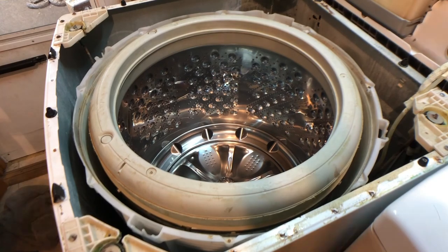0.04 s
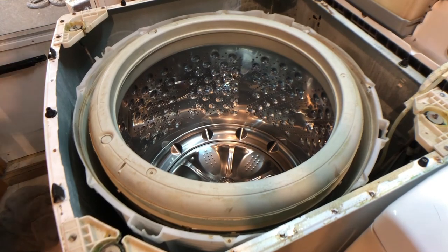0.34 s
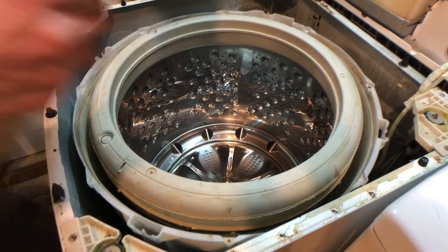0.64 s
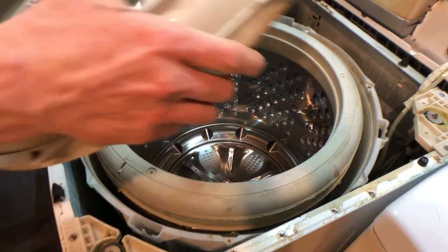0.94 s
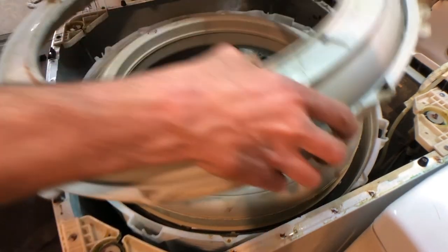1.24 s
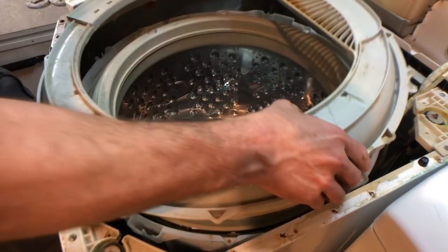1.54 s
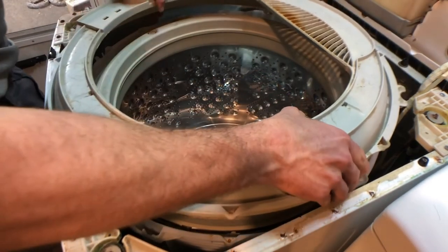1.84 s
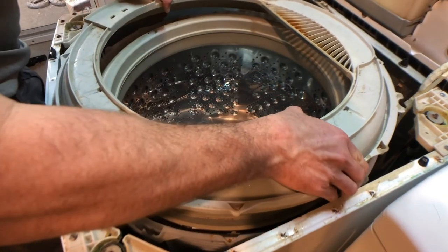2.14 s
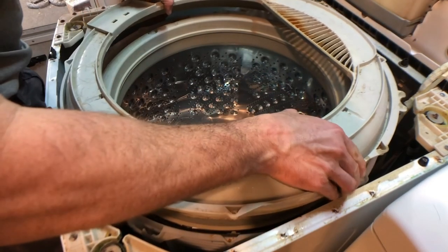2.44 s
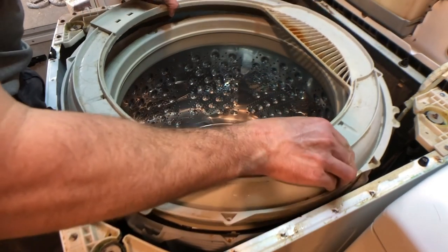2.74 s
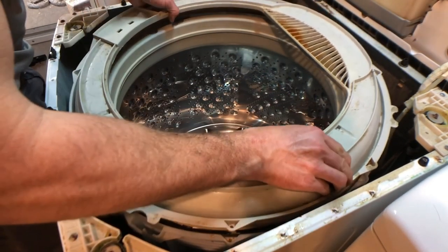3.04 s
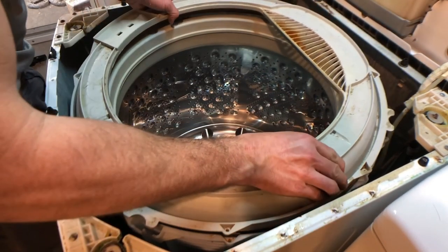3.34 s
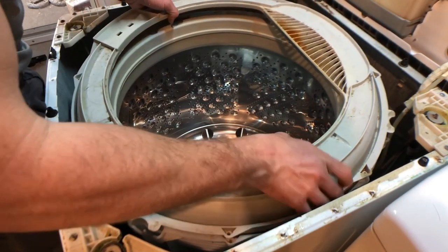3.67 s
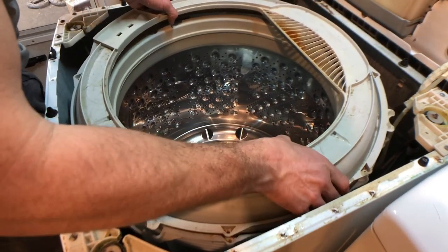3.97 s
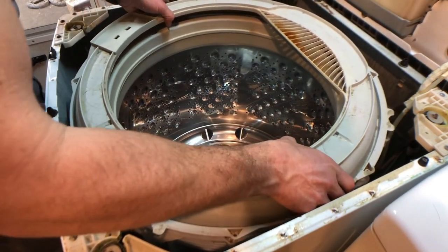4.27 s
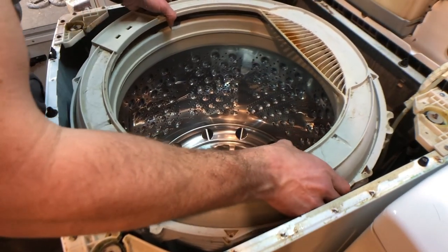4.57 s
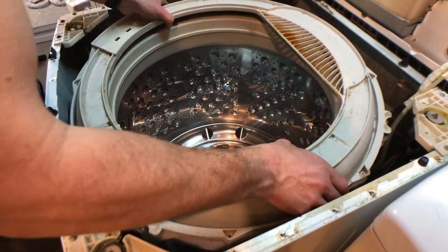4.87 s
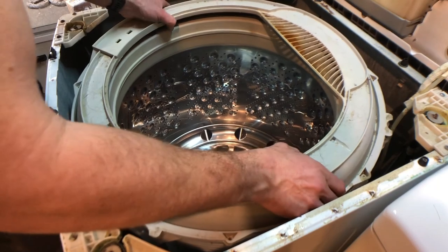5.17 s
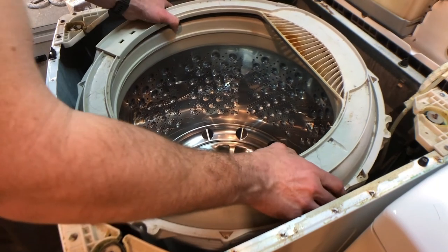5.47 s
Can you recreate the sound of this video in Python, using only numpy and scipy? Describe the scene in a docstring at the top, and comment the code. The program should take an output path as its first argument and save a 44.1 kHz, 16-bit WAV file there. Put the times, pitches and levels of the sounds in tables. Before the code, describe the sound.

Close by in a small room, a big plastic ring is fitted onto a washer tub. Faint handling rustles and ticks lead to a clack as it is set down. Short scrapes and scattered plastic knocks follow, with the hollow tub thumping and briefly ringing under each push. A last hard press gives several loud, rapid knocks with a deep boom.

```python
"""Plastic ring pressed onto a washer tub.

A large plastic ring is carried over a washing machine, set on its tub and pressed home, close by
in a small room. Fingers brush it, its rim scrapes and clacks on the tub's edge, and each push makes
the hollow tub thump. An early nudge leaves the microphone's support swaying slowly."""
import sys
import numpy as np
from scipy import signal
from scipy.fft import rfft, irfft, next_fast_len
from scipy.io import wavfile
from scipy.ndimage import map_coordinates

SR = 44100
rng = np.random.default_rng(int(sys.argv[2]) if len(sys.argv) > 2 else 0)


def unload_wav(signal):
    """Save mono or channel-first audio to the path in sys.argv[1] as 16-bit WAV at rate SR, clipped to [-1, 1]."""
    wavfile.write(
        sys.argv[1],
        SR,
        np.round(np.clip(np.atleast_2d(signal).T, -1, 1) * 32767).astype(np.int16),
    )


N = 247401


def amp(db):
    """Decibels to gain."""
    return 10 ** (np.asarray(db) / 20)


def unit(x):
    """Scale to rms 1."""
    return x / np.sqrt(np.mean(x ** 2) + 1e-20)


def along(points, hz):
    """Interpolate (Hz, value) points on a log frequency axis."""
    point_hz, values = np.transpose(points)
    return np.interp(np.log(hz + 1), np.log(point_hz + 1), values)


def wobble(knots_per_s):
    """Smooth random curve."""
    knots = rng.standard_normal(int(N * knots_per_s / SR) + 4)
    return map_coordinates(knots, [np.arange(N) * knots_per_s / SR])


def fading(start_s, t60_s):
    """Envelope that jumps to 1 and falls 60 dB in t60_s."""
    age = np.arange(N) / SR - start_s
    return (age >= 0) * amp(-60 * np.maximum(age, 0) / t60_s)


def held(start_s, length_s, attack_s, release_s):
    """Envelope that swells, holds and dies away."""
    age = np.maximum(np.arange(N) / SR - start_s, 0)
    return (1 - np.exp(-age / attack_s)) * np.exp(-np.maximum(age - length_s, 0) / release_s)


def add(track, start_s, sound):
    """Mix a sound into a track."""
    part = track[max(round(start_s * SR), 0):][:len(sound)]
    part += sound[:len(part)]


def through(x, response):
    """Convolve with an impulse response, keeping the length."""
    return signal.fftconvolve(x, response)[:len(x)]


def excite(blow, response):
    """A blow rings through a response and keeps its energy."""
    ringing = through(np.pad(blow, (0, SR // 10)), response)
    return ringing * np.linalg.norm(blow) / np.linalg.norm(ringing)


def burst(t60_points, size=8192):
    """A blow into crowded modes: noise whose bands each die at their own rate."""
    hz, t, bands = signal.stft(rng.standard_normal(size), SR, nperseg=256)
    decay = amp(-60 * t / along(t60_points, hz)[:, None])
    return signal.istft(bands * decay, SR, nperseg=256)[1][:size]


def slips(per_s, smooth):
    """Friction of rms 1: tiny uneven slips over a smooth drag."""
    grains = (rng.random(N) < per_s / SR) * rng.standard_normal(N)
    return unit(unit(grains) + smooth * rng.standard_normal(N))


def favour(x, hz, boost, q, low_share=0.38):
    """The contact point favours one band and hardly stirs lower modes; power is kept."""
    peaked = x + boost * signal.lfilter(*signal.iirpeak(hz, q, SR), x)
    cutoff_hz = low_share * min(hz, 1200)
    shaped = signal.lfilter(*signal.butter(2, cutoff_hz, "highpass", fs=SR), peaked)
    return shaped * np.std(x) / np.std(shaped)


# Each row: resonance in Hz, width in Hz, relative height in dB.
RING_MODES = [(333, 58, 7), (511, 94, 9), (615, 78, 1), (693, 73, -0.5), (725, 9.7, 0), (807, 225, 1),
              (1013, 340, -0.5), (1104, 100, -12.5), (1350, 73, -5.5), (1553, 94, -5), (1690, 24, -1.5),
              (2110, 37, -8), (2405, 150, -3.5), (2730, 140, -13)]


def colour(spectrum, ring_db=0, size=8192):
    """Minimum-phase response of a spectrum; ring_db scales the ring's resonance peaks on it."""
    hz = np.fft.rfftfreq(size, 1 / SR)
    peaks = sum(amp(db) / (1 + (2 * (hz - mode_hz) / width) ** 2) for mode_hz, width, db in RING_MODES)
    magnitude = unit(amp(along(spectrum, hz) + ring_db * peaks))
    cepstrum = irfft(np.log(magnitude))
    cepstrum[1:size // 2] *= 2
    cepstrum[size // 2 + 1:] = 0
    return irfft(np.exp(rfft(cepstrum)))


# Each row: frequency in Hz, relative level in dB.
AIR_SPECTRUM = [(20, 7.5), (60, 16), (150, -3.5), (500, -2.5), (1500, -5), (3000, -23), (5000, -25),
                (10000, -26.5), (15500, -29.5)]


def air(level_db=-64):
    """Quiet, steady air of the room."""
    return amp(level_db) * through(rng.standard_normal(N), colour(AIR_SPECTRUM))


# Each row: frequency in Hz, relative level in dB.
RUMBLE_SPECTRUM = [(8, -15), (20, -24), (32, -12.5), (50, -21.5), (90, -44.5), (200, -58), (800, -110)]


def microphone_sway(sway_hz=9.6, level_db=-25, nudge_s=0.17, rise_s=0.065, hold_s=0.72, fade_db_per_s=8):
    """A nudge swings the microphone below hearing; swing, nudge and pushes add a faint rumble."""
    t = np.arange(N) / SR
    fade_db = fade_db_per_s * np.maximum(t - nudge_s - hold_s, 0)
    reach = amp(level_db - fade_db) * (1 - np.exp(-np.maximum(t - nudge_s, 0) / rise_s))
    swing = np.sqrt(2) * np.sin(2 * np.pi * sway_hz * t + 0.28 * wobble(2.97))
    jolts = [(nudge_s, -31)] + [(start_s, db - 25) for start_s, db, *_ in PUSHES]
    power = sum((amp(db) * fading(start_s, t60_s=1.34)) ** 2 for start_s, db in jolts)
    power += (amp(-20.5) * reach) ** 2
    rumble = through(np.sqrt(power) * rng.standard_normal(N), colour(RUMBLE_SPECTRUM))
    return reach * swing + rumble


# Each row: frequency in Hz, T60 in seconds.
ROOM_T60 = [(100, 0.48), (300, 0.26), (800, 0.28), (2500, 0.24), (6000, 0.19), (14000, 0.092)]


def room(x, rise_s=0.001):
    """The steel drum and near walls answer with a short tail."""
    tail = burst(ROOM_T60, size=SR // 2)
    tail *= 1 - np.exp(-np.arange(len(tail)) / SR / rise_s)
    return through(x, tail / np.linalg.norm(tail))


def cabinet(x, strength=0.088, delay_range_s=(0.002108, 0.02), count=14):
    """The cabinet's panels return weak early copies that comb the sound."""
    out = x.copy()
    for delay_s, sign in zip(rng.uniform(*delay_range_s, count), rng.choice([-1, 1], count)):
        add(out, delay_s, sign * strength * x)
    return out / np.sqrt(1 + count * strength ** 2)


# Each row: frequency in Hz, relative level in dB.
HOLLOW_SPECTRUM = [(25, 11), (60, 8.5), (120, 7.5), (250, 6), (450, -1.5), (750, -5.5), (1200, -11.5),
                   (3000, -56.5)]


def drum_murmur(gain_db=-16, t60_s=0.97):
    """The hollow drum murmurs on after each clack that echoes in it."""
    power = sum((amp(db + echo_db + gain_db) * fading(start_s, t60_s)) ** 2
                for start_s, db, *_, echo_db in RIM_CONTACTS)
    return through(np.sqrt(power) * rng.standard_normal(N), colour(HOLLOW_SPECTRUM, ring_db=2))


# Each row: frequency in Hz, relative level in dB.
RASP_SPECTRUM = [(100, 9), (300, -4.5), (700, -3), (1100, 2), (1600, 4), (2100, -0.5), (2900, 0),
                 (3800, -10.5), (5500, -22), (10000, -79), (15500, -50)]
HISS_SPECTRUM = [(1500, -46), (4300, 0.5), (5300, 2.5), (6000, 1), (6700, 3.5), (7500, 2), (9000, -1),
                 (11500, -9.5), (15500, -22)]
# Each row: start in seconds, length in seconds, then hollow, rasp and hiss levels in dB.
RING_SHIFTS = [(-.03, 0.18, -64.5, -61, -69), (0.168, 0.28, -74, -55, -70.5), (0.455, .25, -77, -54.5, -65),
               (0.77, 0.31, -77, -59.5, -71), (1.039, 0.2, -77, -54, -70.5),
               (1.205, 0.24, -50, -59.5, -77.5), (1.468, 0.38, -46.5, -61.5, -81.5),
               (1.908, 0.23, -56.5, -61, -74.5), (2.242, 0.38, -55.5, -59.5, -74),
               (2.745, 0.19, -64, -63.5, -78.5), (3.297, .13, -70, -71.5, -86),
               (3.534, 0.38, -67, -68, -85), (4.102, 0.29, -54.5, -68, -81),
               (4.718, 0.25, -54.5, -63.5, -82), (4.997, 0.24, -55, -65, -76.5),
               (5.282, 0.34, -62.5, -67.5, -73.5)]


def rubbing(attack_s=0.01, release_s=0.064, gain_db=-1.5):
    """Each shift of the ring makes tub and ring murmur under the uneven drag."""
    hollow_env, rasp_env, hiss_env = sum(
        np.outer(amp(levels_db), held(start_s, length_s, attack_s, release_s))
        for start_s, length_s, *levels_db in RING_SHIFTS)
    drag = amp(wobble(48) + gain_db)
    hollow = through(slips(per_s=1100, smooth=1.17), colour(HOLLOW_SPECTRUM, ring_db=0.5))
    rasp = through(slips(per_s=1500, smooth=1), colour(RASP_SPECTRUM, ring_db=-0.5))
    hiss = through(slips(per_s=460, smooth=4.3), colour(HISS_SPECTRUM))
    return drag * (hollow_env * hollow + rasp_env * rasp + hiss_env * hiss)


# Each row: centre in seconds, half length in seconds, hiss level in dB, rasp level in dB.
FINGER_BRUSHES = [(0.273, 0.0065, -67, -60), (0.373, 0.01, -64, -62), (0.585, 0.016, -58, -53.5),
                  (0.801, 0.013, -60.5, -65), (0.838, 0.0066, -59, -59), (0.921, 0.0077, -51.5, -59),
                  (1.037, 0.0064, -55.5, -55), (1.079, 0.0096, -51.5, -50.5), (1.118, 0.018, -57.5, -53),
                  (1.232, 0.025, -59, -46)]
# Each row: centre in seconds, half length in seconds, rasp level in dB, favoured band in Hz.
RIM_SCRAPES = [(0.337, 0.0029, -36.5, 1140), (2.056, 0.034, -56.5, 1730), (2.275, 0.013, -59.5, 1720),
               (2.529, 0.017, -42, 1620), (2.555, 0.021, -44.5, 3000), (3.727, 0.021, -56, 667),
               (3.818, 0.022, -60.5, 623), (3.866, 0.0092, -61.5, 2430), (4.294, .019, -48.5, 1180),
               (4.605, 0.021, -51, 960), (4.662, 0.021, -47.5, 1230), (4.826, 0.017, -49, 900),
               (5.143, 0.012, -44.5, 830), (5.427, 0.01, -41, 2650)]


def brushes_and_scrapes(brush_hz=1545, hiss_db_per_octave=2.5):
    """Fingers sound one narrow ring resonance, the rim a broader band; higher scrapes hiss more."""
    out = np.zeros(N)
    rasp = through(slips(per_s=900, smooth=0.96), colour(RASP_SPECTRUM, ring_db=7.5))
    hiss = through(slips(per_s=4400, smooth=0.46), colour(HISS_SPECTRUM))

    def stroke(centre_s, half_s, rasp_db, hiss_db, hz, boost, q):
        """One bell-shaped swell of friction."""
        first, last = round((centre_s - 4 * half_s) * SR), round((centre_s + 4 * half_s) * SR)
        span = np.arange(max(first, 0), min(last, N))
        swell = np.exp(-0.5 * ((span / SR - centre_s) / half_s) ** 2)
        band = favour(rasp[span], hz, boost, q, low_share=0.59)
        out[span] += swell * (amp(rasp_db) * band + amp(hiss_db) * hiss[span])

    for centre_s, half_s, hiss_db, rasp_db in FINGER_BRUSHES:
        stroke(centre_s, half_s, rasp_db, hiss_db, brush_hz, boost=8.1, q=13)
    for centre_s, half_s, rasp_db, hz in RIM_SCRAPES:
        hiss_db = rasp_db - 19.5 + hiss_db_per_octave * np.log2(hz / 1000)
        stroke(centre_s, half_s, rasp_db, hiss_db, hz, boost=3.1, q=3)
    return out


# Each row: frequency in Hz, T60 in seconds.
PLASTIC_T60 = [(200, 0.18), (800, 0.069), (2500, 0.089), (7000, 0.13), (14000, 0.05)]
# Each row: frequency in Hz, relative level in dB.
THUD_SPECTRUM = [(25, -45), (90, -15), (160, 0.5), (260, 3.5), (400, -6), (700, -11.5), (2000, -68.5),
                 (8000, -100)]
SHUDDER_SPECTRUM = [(20, 0), (45, -15), (62, -1), (80, 2), (130, -3), (300, -38), (2000, -100)]
# Each row: mode in Hz, relative level in dB, T60 in seconds.
WALL_MODES = [(128.2, -7.5, 0.27), (157, -15, 0.075), (181.3, -8.5, 0.25), (216.2, -1, 0.18),
              (252, -11.5, 0.052), (269, -13, 0.14), (318, -15, 0.3), (349.6, -10.5, 0.24),
              (380.3, -6.5, 0.055), (392, -7, 0.12), (489.6, -10.5, 0.078)]
# Each row: start in seconds, level in dB, bass offset in dB, hardness in dB per octave.
PUSHES = [(0.166, -48, 7, 10.5), (0.215, -52, 5, -15), (0.659, -50.5, 7.5, -20), (1.203, -29, -2, 1.5),
          (1.238, -32, 1, -14), (1.598, -18.5, -18, 2.5), (1.824, -37.5, -25, 4), (2.798, -19, -5.5, -1.5),
          (3.207, -24.5, -10, -18), (3.284, -21, -5.5, -9), (3.309, -25.5, 1, 5), (4.3, -21, -9, -2.5),
          (4.618, -31, 1, -3.5), (4.64, -30, 6, -1.5), (4.834, -23, -3.5, -3), (5.024, -41.5, 4, -10),
          (5.177, -42, 7.5, 4), (5.415, -15.5, -7.5, -7), (5.436, -8.5, -22, 5), (5.472, -22, 8, 7)]


def tub_thumps(boom_hz=100.6, boom_t60_s=0.29, boom_rise_s=0.0051, wall_rise_s=0.0027,
               wall_db=-7, boom_db=-1, thud_db=-11.5, shudder_db=-14):
    """A push rings the tub's wall and swells its deep boom; harder pushes favour higher modes."""
    out, t = np.zeros(N), np.arange(SR // 2) / SR
    mode = lambda hz, t60_s: np.sin(2 * np.pi * hz * t) * amp(-60 * t / t60_s)
    wall_hz, mode_db, _ = np.transpose(WALL_MODES)
    wall = np.array([(-1) ** k * mode(hz, t60_s) for k, (hz, _, t60_s) in enumerate(WALL_MODES)])
    wall *= 1 - np.exp(-t / wall_rise_s)
    boom = mode(boom_hz, boom_t60_s) * (1 - np.exp(-t / boom_rise_s))
    thud, shudder = colour(THUD_SPECTRUM), colour(SHUDDER_SPECTRUM)
    for start_s, db, bass_db, hardness in PUSHES:
        tilt_db = hardness * np.log2(wall_hz / 200)
        strengths = amp(mode_db + tilt_db + rng.normal(0, 0.22, len(WALL_MODES)))
        add(out, start_s, amp(db + wall_db) * strengths @ wall)
        add(out, start_s, amp(db + bass_db + boom_db) * boom)
        # The whole machine's crowded, damped modes answer less to a soft push.
        add(out, start_s, amp(db + thud_db + hardness / 2) * excite(burst(PLASTIC_T60), thud))
        add(out, start_s, amp(db + bass_db + shudder_db) * excite(burst(PLASTIC_T60), shudder))
    return out


# Each row: frequency in Hz, relative level in dB.
KNOCK_SPECTRUM = [(60, -22), (200, -7.5), (400, 5), (800, 3), (1200, 2), (1700, -31.5), (3000, -55),
                  (6000, -81), (15000, -94)]
CLACK_SPECTRUM = [(100, -52), (400, -37), (1000, -1), (1550, 14.5), (2100, 7), (2900, 3.5), (3800, -13.5),
                  (5200, -24.5), (9000, -51), (15000, -73.5)]
TICK_SPECTRUM = [(300, -43), (1500, -37.5), (3500, 8.5), (5000, 4.5), (7000, 3.5), (9500, -1), (12000, -16),
                 (15500, -22)]
# Each row: start in seconds, level in dB, clack and tick offsets in dB, favoured knock band in Hz,
# echo in dB relative to the direct sound.
RIM_CONTACTS = [(0.171, -38.5, -3, -32, 690, -2), (0.334, -45.5, 16, -1.5, 1110, -12),
                (0.477, -44, 7, 0, 1560, -14), (1.207, -35.5, 2.5, -23, 1330, -12),
                (1.242, -43.5, 16.5, 1, 1590, -22), (1.366, -47, 14, -10, 1560, -27),
                (1.593, -26, 9, -14, 1440, -27), (1.602, -21.5, -4, -24, 560, -8),
                (1.614, -31.5, -1, -17, 880, 6.5), (1.747, -42, -0.5, -14, 530, -3),
                (2.797, -30, -15, -21, 604, -11), (2.93, -30.5, -7, -38, 1040, -2.5),
                (3.207, -46.5, -3.5, -8.5, 950, -14), (3.229, -44, -10.5, -16.5, 950, -6),
                (3.28, -29.5, -21.5, -34, 960, -15), (3.306, -25.5, -25, -31.5, 540, -28),
                (4.302, -44, -3.5, -15, 724, 3), (4.834, -31, -5, -24, 646, -16),
                (5.422, -19, -7, -37, 990, 0), (5.434, -19.5, -3, -17, 530, -6),
                (5.446, -26, -6, -34, 444, -5), (5.464, -12, -19, -41, 820, -30),
                (5.473, -16, -21, -54, 432, -33.5)]


def rim_clacks(knock_db=-7.5, clack_db=-9, tick_db=-8, contact_s=0.00076, crack_s=0.0029,
               echo_rise_s=0.01):
    """The rim strikes and its dense modes ring; contacts over the open drum echo more."""
    out, t = np.zeros(N), np.arange(SR // 3) / SR
    knock, clack = colour(KNOCK_SPECTRUM, ring_db=3.5), colour(CLACK_SPECTRUM, ring_db=6.5)
    tick = colour(TICK_SPECTRUM)
    onset = (1 + 0.31 * np.exp(-t / crack_s)) * (1 - np.exp(-t / contact_s))
    for start_s, db, clack_offset_db, tick_offset_db, hz, echo_db in RIM_CONTACTS:
        direct = burst(PLASTIC_T60, size=len(t)) * onset
        tail = burst(ROOM_T60, size=len(t)) * (1 - np.exp(-t / echo_rise_s))
        blow = direct + amp(echo_db) * tail * np.linalg.norm(direct) / np.linalg.norm(tail)
        strike = amp(knock_db) * favour(excite(blow, knock), hz, boost=1.34, q=1.9)
        strike += amp(clack_db + clack_offset_db) * excite(blow, clack)
        strike += amp(tick_db + tick_offset_db) * excite(blow, tick)
        add(out, start_s, amp(db) * strike)
    return out


def scene():
    """Ring and tub over their echo, the sway and the room's air, in mono."""
    strokes, tub = brushes_and_scrapes(), tub_thumps()
    ring = cabinet(rim_clacks() + strokes + rubbing())
    echo = room(amp(-10) * strokes + amp(-12.5) * tub)
    return (air() + drum_murmur() + microphone_sway() + echo + tub + ring)[None]


def record(dry, top_hz=15700):
    """The microphone keeps nothing above its band limit."""
    size = next_fast_len(N + SR // 4)
    passband = np.fft.rfftfreq(size, 1 / SR) < top_hz
    return irfft(rfft(dry, size) * passband, size)[:, :N]


dry = scene()
out = record(dry)
unload_wav(out)
```